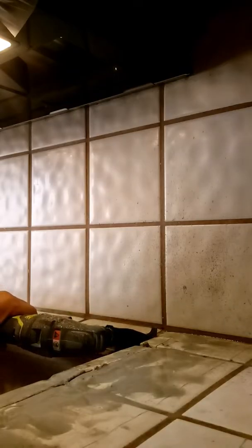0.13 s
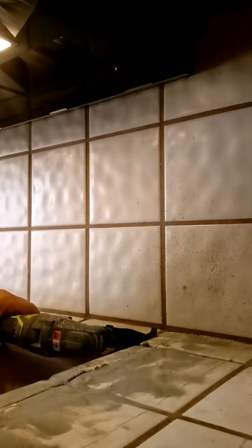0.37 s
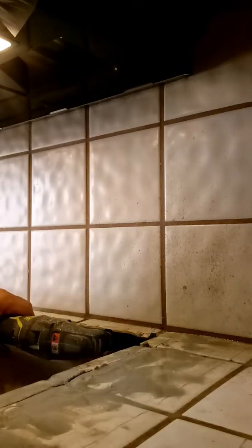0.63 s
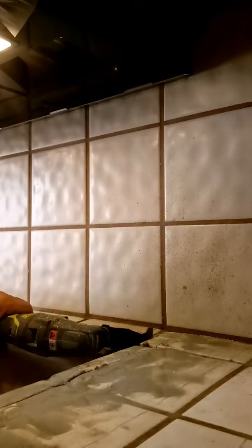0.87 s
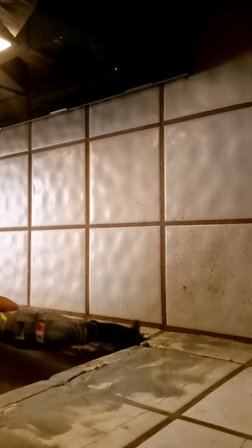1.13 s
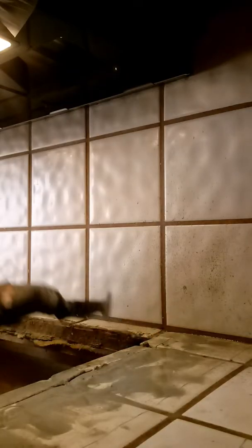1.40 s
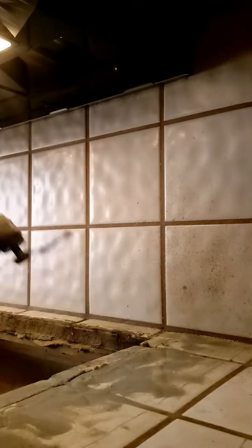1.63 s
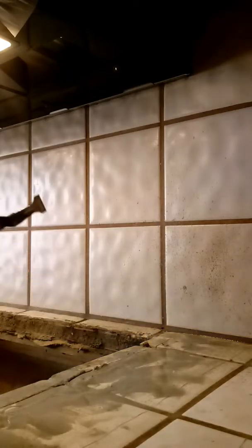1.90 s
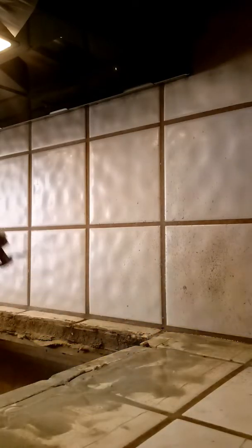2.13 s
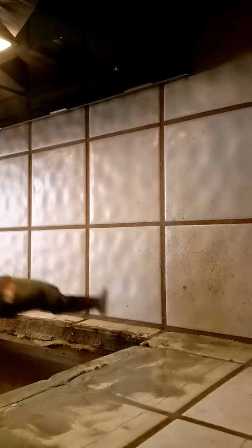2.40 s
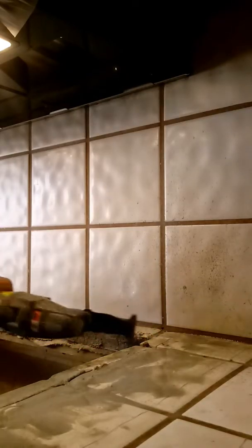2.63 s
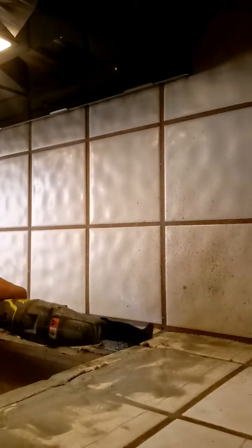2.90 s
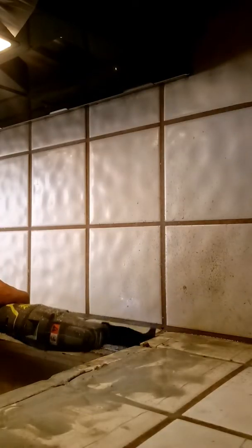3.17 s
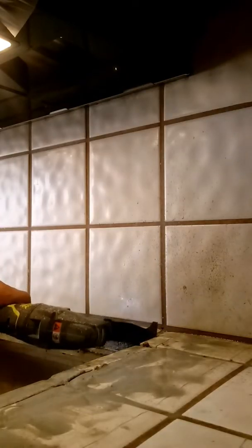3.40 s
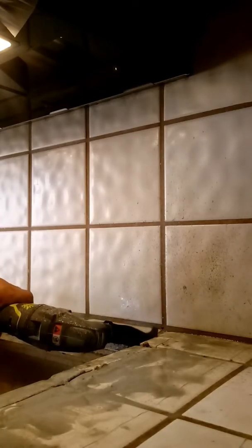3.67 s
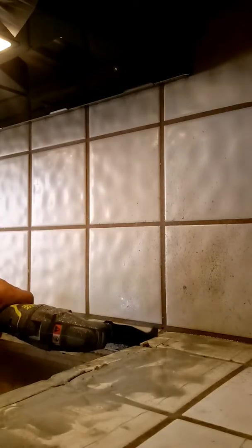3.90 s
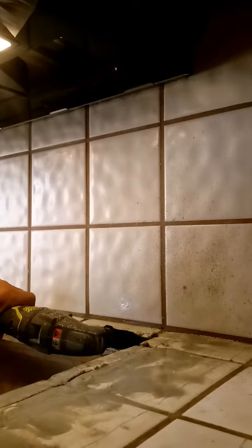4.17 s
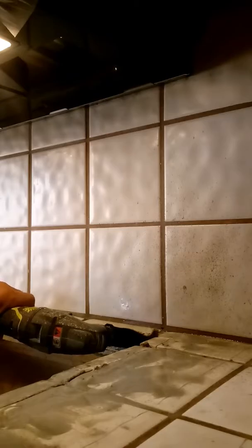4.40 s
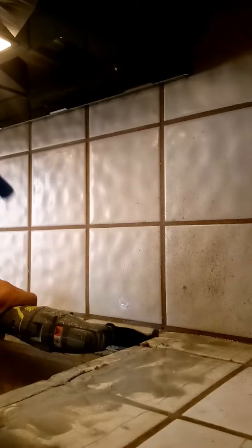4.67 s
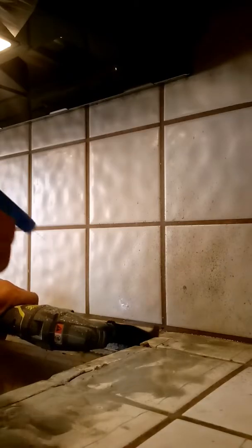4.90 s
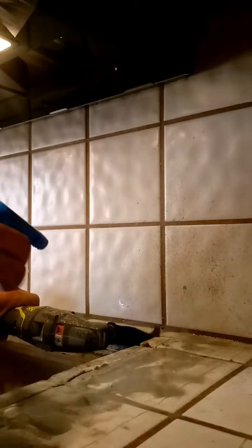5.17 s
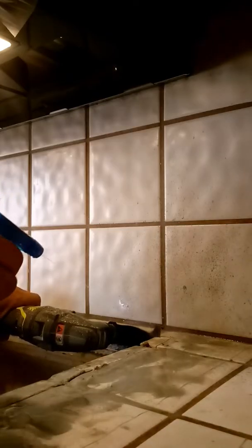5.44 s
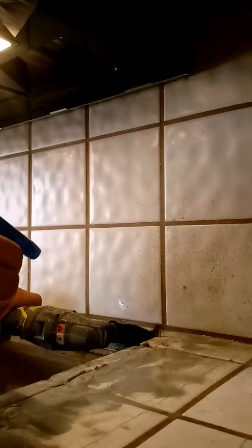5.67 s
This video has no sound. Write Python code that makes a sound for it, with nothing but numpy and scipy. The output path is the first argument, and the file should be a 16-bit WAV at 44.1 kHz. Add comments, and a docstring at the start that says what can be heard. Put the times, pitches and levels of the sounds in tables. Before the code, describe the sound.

A handheld oscillating tool clunks on tile, buzzes twice in the air, then bites in with squeaks and grinds steadily at full speed.

```python
"""A cordless oscillating tool is handled on tiles in a small hard room: struck resonances and filtered grit grains.
It slides with a hollow rustle; then its trigger is squeezed twice in the air, and noise gated by the stroke rattles.
After more knocks the slow blade chatters into the tile and bites with short squeaks in three partials.
Last it runs up to speed and grinds: gated noise rings in the blade under a buzzing whine of stroke multiples."""
import sys
import numpy as np
from scipy import signal
from scipy.fft import rfft, irfft, next_fast_len
from scipy.io import wavfile
from scipy.ndimage import map_coordinates

SR = 44100
rng = np.random.default_rng(int(sys.argv[2]) if len(sys.argv) > 2 else 0)


def master_out(mix):
    """Clip the mix to full scale and print it as 16-bit PCM to the path in sys.argv[1]."""
    frames = np.transpose(np.atleast_2d(mix))
    ceiling = np.clip(frames, -1, 1)
    pcm = np.round(ceiling * 32767).astype(np.int16)
    wavfile.write(sys.argv[1], SR, pcm)


def to_linear_factor(level_db):
    """Convert decibel levels (scalar or array-like) to linear amplitude factors."""
    exponent = np.asarray(level_db, float) / 20
    return 10 ** exponent


N = 255780
T = np.arange(N) / SR

# Colour of the room hiss. Each row: frequency in Hz, relative density in dB per Hz.
HISS_COLOUR = [(20, -18.5), (60, -3.5), (125, -2.5), (250, -10.5), (500, 0.5), (1000, -4.5), (2500, -8.5),
               (5000, -14.5), (7500, -16.5), (10000, -14.5), (13000, -9), (15800, -11)]
HISS_DB = -67
# Low rumble swells. Each row: peak time in seconds, half length (to 1/e) in seconds, level in dB.
RUMBLE_SWELLS = [(0.68, 0.147, -80), (1.33, 0.178, -70), (2.608, 0.078, -68.5), (3.123, 0.125, -64),
                 (3.462, 0.055, -48.5)]
RUMBLE_DB, RUMBLE_RUNNING_DB = -81, -73  # its floor, and what is added with the blade at work
# Reverberation of the room. Each row: frequency in Hz, time to fall 60 dB in seconds.
REVERBERATION = [(300, 1), (800, 0.837), (2100, 0.635), (5500, 0.486), (12000, 0.32)]
# Treble of the microphone. Each row: frequency in Hz, gain in dB.
MICROPHONE_GAIN = [(10500, -0.5), (12300, -5), (13200, -1.5), (14000, -19.5), (14800, -10), (15700, -3)]
TOP_HZ = 15790

# The tool slides away: start, fast fade, then a faint remainder.
SLIDE_S, SLIDE_DB, SLIDE_FADES_DB_PER_S = 1.083, -48.5, 121.5
SLIDE_STAYS_DB, SLIDE_LINGERS_S = -65, 0.91
# Tool dragged on grit; the row at 1.088 s is only a brief rasp within the knock at 1.09 s. Each row: start in
# seconds, end in seconds, level in dB, dull part in dB relative to it.
DRAGS = [(0.0, 0.008, -72, 9), (0.154, 0.16, -71, -11), (0.5, 0.598, -49, -7.5), (0.603, 0.71, -45.5, -7.5),
         (0.825, 0.898, -60.5, -13), (0.968, 1.017, -46, -16.5), (1.012, 1.048, -43.5, 0.5),
         (1.088, 1.089, -38, -2), (1.829, 1.886, -56, 5)]
DRAG_RISE_SHARE, DRAG_FALL_DB_PER_S = 0.262, 418.5  # share of a drag spent rising; dying away after it
# Resonances of tool and blade. Each row: frequency in Hz, basic width in Hz, basic level in dB.
BLADE_MODES = [(814, 34.7, -11), (1514, 82.3, 2.5), (2680, 94, -12), (3017, 58.4, -7), (3707, 237, -11.5),
               (4410, 135, -4.5), (4900, 64.6, -6.5), (5313, 50.5, 2), (6027, 86.7, 5), (7170, 51, -3.5),
               (8200, 31.5, -4.5), (9737, 74, 1.5), (11390, 260, -45), (12940, 133, -7.5),
               (13950, 200, -31.5)]
# Handling knocks and chatter. Each row: start in seconds, level in dB, favoured low resonance in Hz,
# favoured high resonance in Hz, body in dB relative to the rest.
KNOCK_EVENTS = [(0.313, -13, 4384, 5400, -18), (0.52, -31, 4100, 8200, -16.5),
                (0.549, -28, 2310, 4760, -21), (0.579, -33, 1580, 4850, -2),
                (0.609, -25.5, 4080, 4740, -17.5), (0.644, -26.5, 3870, 4900, -24.5),
                (0.662, -28.5, 2680, 4815, -21.5), (0.684, -30, 4010, 4900, -20),
                (0.706, -29, 3970, 5030, -30), (0.826, -33.5, 1355, 2395, -9),
                (0.855, -39, 1250, 4970, -18.5), (0.978, -36.5, 4540, 6040, -20),
                (0.985, -31.5, 4040, 5950, -15.5), (1.023, -26.5, 865, 9650, -16),
                (1.039, -24.5, 841, 4780, -4.5), (1.09, -21, 1087, 5930, -10),
                (1.846, -27.5, 3025, 6240, -41.5), (1.878, -25.5, 820, 8480, -18.5),
                (1.982, -21.5, 3920, 5600, -16), (2.001, -31.5, 3320, 5500, -15.5),
                (2.143, -16.5, 2856, 5600, -13), (2.195, -24.5, 2785, 5340, -20.5),
                (2.212, -19, 4500, 5560, -12.5), (2.274, -26.5, 910, 6870, -20),
                (2.289, -25.5, 850, 5650, -32.5), (2.873, -8, 3785, 9535, -28.5),
                (2.883, -5.5, 3963, 5972, -30), (2.892, -8, 2867, 5830, -11),
                (3.065, -15, 895.8, 5890, 1.5), (3.088, -20.5, 863.7, 5120, -6.5),
                (3.121, -23.5, 888, 4900, -10), (3.241, -22.5, 3795, 5030, -6),
                (3.33, -11, 3060, 4835, -27.5), (3.346, -12, 3534, 4925, -16.5),
                (3.381, -13, 3764, 4830, -25), (3.401, -10.5, 4067, 5120, -5),
                (3.427, -6.5, 1831, 4920, -15), (3.467, -10.5, 3954, 4900, -6.5),
                (3.556, -12.5, 1410, 5060, -9)]
TREBLE_DB, TREBLE_PER_BODY = -21.5, -0.328  # the more body a knock has, the less treble

# Switching whine as the trigger closes. Each row: start in seconds, end in seconds, level in dB.
WHINE_EVENTS = [(1.934, 1.998, -48), (2.345, 2.41, -49.5), (3.193, 3.342, -51)]
# Partials of that whine. Each row: frequency in Hz, relative level in dB.
WHINE_PARTIALS = [(1938, -4), (3871, 1), (3914, 1.5), (5809, -8), (7745, -12.5), (11620, -26.5)]
# Speed of the blade. Each row: time in seconds, strokes per second in Hz.
STROKE_RATE = [(1.95, 60.38), (2.1, 87.58), (2.25, 69.22), (2.38, 89.6), (2.44, 127.6), (2.55, 145.7),
               (2.63, 136.6), (2.82, 71.8), (3.3, 40.54), (3.75, 78.1), (3.85, 80.54), (3.92, 91.62),
               (4.05, 137.8), (4.108, 222.6), (4.15, 251), (4.232, 260.1), (4.356, 262), (4.578, 255.6),
               (4.74, 261.4), (4.97, 256.4), (5.378, 257.7), (5.8, 251.9)]
# The swinging head hums while the motor is slow. Each row: start in seconds, end in seconds,
# mean levels in dB rms of stroke multiples 1, 2 and 3.
HEAD_HUM = [(2.443, 2.742, -56.5, -70.5, -70.5), (3.519, 3.794, -55.5, -49, -50),
            (3.822, 4.088, -47, -53, -52.5)]
HUM_FADE_S = 0.086
# Pure multiples of the stroke. Each row: multiple, basic level in dB rms, drift in dB per second,
# share of the common swell, flicker in dB.
PURE_MULTIPLES = [(1, -49.5, 1, 0.468, 0), (2, -40.5, 2.5, 0.265, 4), (4, -35, -7, 1.33, 2),
                  (5, -30.5, 6.5, 1.1, 2.5), (7, -37.5, -0.5, -0.052, 0), (9, -36.5, 3.5, -1.195, 0.87)]
DRIFT_FROM_S = 4.976  # the drift is zero here
# Common swell of the pure multiples. Each row: time in seconds, swell in dB.
COMMON_SWELL = [(4.1, -3.5), (4.17, 0.5), (4.3, 1), (4.45, -3.5), (4.6, 8), (4.66, -1), (4.7, -4.5),
                (4.84, -4), (4.97, 4), (5.1, -7), (5.38, -6), (5.53, 3.5), (5.6, -5), (5.66, 2.5), (5.8, 3)]
# The loudest multiple, the third. Each row: time in seconds, mean level in dB rms.
THIRD_MULTIPLE = [(4.1, -35.5), (4.17, -29.5), (4.31, -43.5), (4.45, -32), (4.58, -22), (4.65, -22.5),
                  (4.7, -39.5), (4.82, -29.5), (4.97, -21), (5.1, -25), (5.65, -22), (5.8, -24)]
STEADY_S, STEADY_RISE_S = 4.08, 0.0585  # the multiples of the stroke stand out from here on

# Teeth catching in the groove. Each row: start in seconds, level in dB, squeak pitch in Hz.
TOOTH_CATCHES = [(3.7487, -8, 5314), (3.7868, -3.5, 4960), (3.7998, -9, 5035), (3.86, -9, 4873),
                 (3.886, -5.5, 4790), (3.909, -12.5, 4640), (3.9194, -10, 5330), (3.937, -7, 5010),
                 (3.9588, -12.5, 4530), (4.0025, -21.5, 4440)]
TICK_HZ, TICK_DB, TICK_SHARP_DB = 7780, 2.5, 21  # level before pulsing; depth of the pulsing
# Two squeezes in the air, then the cut: one list for each run.
# Each row: time in seconds, level of rattle and grind in dB.
RUN_LEVELS = [
    [(1.94, -53), (1.975, -40.5), (2.0, -28.5), (2.082, -23), (2.184, -27.5), (2.25, -64)],
    [(2.34, -56), (2.375, -39.5), (2.402, -28.5), (2.438, -21.5), (2.636, -22), (2.772, -26.5), (2.87, -34)],
    [(3.31, -48), (3.33, -30.5), (3.364, -35), (3.54, -29), (3.64, -22.5), (3.745, -23.5), (3.78, -49.5),
     (3.79, -33.5), (3.81, -35.5), (3.845, -22), (3.88, -33.5), (3.95, -22.5), (4.16, -15), (4.32, -18.5),
     (4.44, -15.5), (4.6, -17), (5.8, -16.5)],
]
# Housing drone. Each entry: level in dB relative to the run's rattle and grind, run by run.
RUN_DRONE = [-12, -8, -5.5]
# Colour of the housing drone. Each row: frequency in Hz, relative density in dB per Hz.
DRONE_COLOUR = [(94, -62.5), (160, -35.5), (226, -15.5), (279, -22.5), (449, -3.5), (562, -6.5), (654, -2),
                (1030, 1.5), (1430, 0), (1800, -4.5), (2340, -6), (3960, -120)]
MUFFLE_S, MUFFLE_TAKES_S, MUFFLE_DB = 3.8975, 0.369, -16  # the drone sinks once the blade is in the groove
# Squeal as the blade settles in the groove. Each row: time in seconds, mean pitch in Hz, basic level in dB.
BLADE_SQUEAL = [(3.62, 5266, -37.5), (3.68, 5360, -36), (3.76, 5163, -21), (3.78, 5227, -49.5),
                (3.83, 5164, -23), (3.9, 4776, -28), (3.97, 4628, -25), (4.03, 4511, -20.5),
                (4.1, 4430, -28.5)]
# Unsteady multiples of the stroke. Each row: multiple, basic amplitude in dB relative to the grind.
BUZZ_MULTIPLES = [(6, -21.5), (8, -25), (10, -16.5), (11, -15.5), (12, -32), (13, -13.5), (14, -14.5),
                  (15, -22), (16, -14), (17, -15), (18, -10.5), (19, -14.5), (20, -11), (21, -14.5),
                  (22, -13.5), (23, -20.5)]
# Colour of the free blade. Each row: frequency in Hz, relative density in dB per Hz.
RATTLE_COLOUR = [(710, -31), (1200, -8), (1430, -4.5), (1850, -14), (2940, 1), (3500, -2.5), (4490, 0.5),
                 (5510, 0), (6340, -8.5), (7070, -7), (9360, -11), (13400, -44), (15900, -58)]
# Colour of the blade in the tile. Each row: frequency in Hz, relative density in dB per Hz.
GRIND_COLOUR = [(530, -34.5), (900, -23.5), (1030, 4), (1190, -18.5), (1260, 0), (1420, -15), (1830, -4.5),
                (2190, -9.5), (2350, -7.5), (4500, -1.5), (6540, -6.5), (7190, -4.5), (9600, -7.5),
                (11000, -23.5), (15900, -23.5)]


def unit(x):
    """Normalisation: scale to rms 1."""
    return x / np.sqrt(np.mean(x ** 2) + 1e-20)


def along(points, hz):
    """Interpolation of (Hz, value) points on a logarithmic frequency axis."""
    f, v = np.transpose(points)
    return np.interp(np.log(hz + 1), np.log(f + 1), v)


def curves(rows, outside=None):
    """Linear interpolation in time: one value per sample for each column after the first."""
    s, *cols = np.transpose(rows)
    return [np.interp(T, s, c, outside, outside) for c in cols]


def ramp(s, takes):
    """Linear rise: 0 before s, 1 from s + takes on."""
    return np.clip((T - s) / takes, 0, 1)


def wobble(rate):
    """Band-limited fluctuation: a smooth random curve with rate knots a second."""
    coarse = T[::32]
    knots = rng.standard_normal(int(N * rate / SR) + 4)
    return np.interp(T, coarse, map_coordinates(knots, [coarse * rate]))


def filtered(x, response):
    """Linear filtering: the spectrum of x times a complex response of frequency."""
    m = next_fast_len(len(x) + 8192)
    return irfft(rfft(x, m) * response(np.fft.rfftfreq(m, 1 / SR)), m)[:len(x)]


def ringing(hz, modes):
    """Modal superposition: causal response of (Hz, width, dB) resonances with alternating signs."""
    total = 0
    for k, (centre, width, db) in enumerate(modes):
        damping = 1j * hz * width
        total = total + (-1) ** k * to_linear_factor(db) * damping / (centre * centre - hz * hz + damping)
    return total


def echoes(x):
    """Reverberation: convolution with noise whose every frequency decays at its own speed."""
    hz, t, z = signal.stft(rng.standard_normal(SR // 2), SR, nperseg=256)
    decay = to_linear_factor(-60 * t / along(REVERBERATION, hz)[:, None])
    tail = signal.istft(z * decay, SR, nperseg=256)[1]
    delayed = np.pad(x, (250, 0))  # samples
    return signal.fftconvolve(delayed, tail / np.linalg.norm(tail))


def add(out, s, x):
    """Superposition: mix x into out from time s."""
    part = out[round(s * SR):]
    part[:len(x)] += x[:len(part)]


def quiet():
    """Broadband and resonant noise: room hiss, low rumble, cooling air puffing at the microphone."""
    hiss = to_linear_factor(HISS_DB) * unit(filtered(rng.standard_normal(N), lambda hz: to_linear_factor(along(HISS_COLOUR, hz))))
    low = unit(filtered(rng.standard_normal(N), lambda hz: ringing(hz, [(135.2, 120, 0)]) ** 2))
    air = to_linear_factor(5.1 * wobble(7)) * rng.standard_normal(N)
    puffs = unit(filtered(air, lambda hz: ringing(hz, [(32, 25.3, 0)]) ** 2))
    swells = sum(to_linear_factor(db) * np.exp(-((T - s) / half) ** 2) for s, half, db in RUMBLE_SWELLS)
    rumble = to_linear_factor(RUMBLE_DB) + to_linear_factor(RUMBLE_RUNNING_DB) * ramp(2.3, 1.401) + swells
    return hiss + rumble * low + to_linear_factor(-65.5) * ramp(4.289, .33) * puffs


def slide():
    """Friction noise through three hollow resonances: it fades fast, then lingers unevenly."""
    rub = to_linear_factor(2.05 * wobble(39.86)) * rng.standard_normal(N)
    modes = [(2223, 285, 0), (2833, 166, 0.0), (4900, 450, -2)]
    hollow = unit(filtered(rub, lambda hz: ringing(hz, modes) ** 2))
    fades = to_linear_factor(SLIDE_DB - SLIDE_FADES_DB_PER_S * np.abs(T - SLIDE_S))
    lingers = to_linear_factor(SLIDE_STAYS_DB + 1.54 * wobble(11.81)) * (1 - ramp(SLIDE_S, SLIDE_LINGERS_S))
    return (T > SLIDE_S) * (fades + lingers) * hollow


def scrape():
    """Random impulse excitation: uneven grit grains drive the tool's resonances and a dull body."""
    grains = (rng.random((2, N)) < .1) * rng.standard_normal((2, N)) * to_linear_factor(3.07 * wobble(90))
    modes = [(c, 1.67 * w, db) for c, w, db in BLADE_MODES]
    colour = [(900, -36.5), (2000, 0.5), (6000, -9.0), (11000, -10.5), (16000, -39)]
    body = [(597.6, 299, -2.5), (851.6, 104, 3.5), (1250, 363, -1.0)]
    bright = unit(filtered(grains[0], lambda hz: (ringing(hz, modes) + to_linear_factor(-43)) * to_linear_factor(along(colour, hz))))
    dull = unit(filtered(grains[1], lambda hz: ringing(hz, body) ** 2))
    out = np.zeros(N)
    for start, end, db, dull_db in DRAGS:
        rise = ramp(start, DRAG_RISE_SHARE * (end - start)) ** 2
        fall = to_linear_factor(-DRAG_FALL_DB_PER_S * np.maximum(T - end, 0))
        out += to_linear_factor(db) * rise * fall * (bright + to_linear_factor(dull_db) * dull)
    return out


def knocks():
    """Impact excitation: a short rough contact rings the tool near two resonances; the room answers."""
    out, t = np.zeros(N), T[:4000]
    for s, db, low_hz, high_hz, body in KNOCK_EVENTS:
        treble = TREBLE_DB + TREBLE_PER_BODY * body
        rise = 0.000625 * max(to_linear_factor(body + 13.5), 1)  # a duller contact is a softer one
        contact = np.exp(-t / 0.00512) * (1 - np.exp(-t / rise)) * rng.standard_normal(len(t))
        modes = [(c, 2.29 * w, min(g, -2.5) + rng.normal(0, 3.32)) for c, w, g in BLADE_MODES]
        colour = [(100, body - 44), (450, body - 12), (750, body + 3), (1600, body + 2.6), (2400, -6),
                  (5400, -12.5), (6200, treble + 1.33), (10300, treble), (15700, treble - 15)]

        def response(hz):
            low = 1 + ringing(hz, [(low_hz, 0.0085 * low_hz + 80, 14)])
            high = 1 + ringing(hz, [(high_hz, 0.0252 * high_hz + 60, 10)])
            return to_linear_factor(along(colour, hz)) * low * high * (ringing(hz, modes) + to_linear_factor(-14.5))

        hit = filtered(contact, response)
        hit *= to_linear_factor(db - 3.5) / abs(hit).max()
        add(out, s, hit)
        add(out, s, to_linear_factor(-6.5) * echoes(hit))
    return out


def whine():
    """Switching tones: thin, unsteady partials from the motor drive before the shaft gets going."""
    gate, partials = np.zeros(N), np.zeros(N)
    for start, end, db in WHINE_EVENTS:
        gate += to_linear_factor(db) * ramp(start, 0.0081) * np.clip((end - T) / 0.018, 0, 1)
    for hz, db in WHINE_PARTIALS:
        level = np.sqrt(2) * to_linear_factor(db + 3.5 * wobble(90))
        partials += level * np.sin(2 * np.pi * hz * T + 0.77 * wobble(120))
    return gate * partials


def strokes():
    """Phase as the integral of frequency: a running count of blade strokes."""
    return np.cumsum(curves(STROKE_RATE)[0]) / SR


def hum(turn):
    """Periodic motion of the swinging head: three low harmonics of the slow stroke."""
    out = np.zeros(N)
    for k in range(3):
        gate = np.zeros(N)
        for start, end, *dbs in HEAD_HUM:
            rise = ramp(start - HUM_FADE_S / 2, HUM_FADE_S)
            fall = 1 - ramp(end - HUM_FADE_S / 2, HUM_FADE_S)
            gate += to_linear_factor(dbs[k]) * rise * fall
        level = np.sqrt(2) * gate * to_linear_factor(2.286 * wobble(14))
        out += level * np.sin((k + 1) * turn + 0.61 * wobble(37))
    return out


def tones(turn):
    """Harmonic series: low multiples of the stroke, nearly pure, slowly changing in level."""
    out, swell = np.zeros(N), curves(COMMON_SWELL)[0]
    for k, db, drift, share, flicker in PURE_MULTIPLES:
        level = db + drift * (T - DRIFT_FROM_S) + share * swell
        level = level + flicker * wobble(8) + 1.595 * wobble(30)
        tone = np.sin(k * turn + 0.063 * k * wobble(40))
        out += np.sqrt(2) * ramp(STEADY_S, .03) * to_linear_factor(level) * tone
    third_level = curves(THIRD_MULTIPLE, outside=-140)[0] + 2.42 * wobble(30)
    out += np.sqrt(2) * to_linear_factor(third_level) * np.sin(3 * turn + 0.209 * wobble(40))
    return out


def bites():
    """Stick and slip: each catch is a short squeak with partials at 1/2, 1 and 3/2 of its pitch."""
    out, t = np.zeros(N), T[:900]
    for s, db, hz in TOOTH_CATCHES:
        turn = 2 * np.pi * hz * t + np.cumsum(0.077 * rng.standard_normal(len(t)))
        squeak = to_linear_factor(-4) * np.sin(turn / 2) + np.sin(turn) + to_linear_factor(-9) * np.sin(3 * turn / 2)
        envelope = t / 0.001416 * np.exp(1 - t / 0.001318)
        add(out, s, to_linear_factor(db - 6.0) * envelope * squeak)
    return out


def tick(phase, level):
    """Pulsed carrier: a thin tick once a stroke on the first, gentle squeeze."""
    pulse = to_linear_factor(TICK_SHARP_DB * (np.cos(2 * np.pi * phase) - 3) + 3 * wobble(50.4))
    carrier = np.sin(2 * np.pi * TICK_HZ * T + 0.6 * wobble(400))
    return to_linear_factor(level + TICK_DB) * pulse * carrier


def gated(phase, depth_db, scatter_db, spectrum, ring_db):
    """Amplitude modulation: noise swells once a stroke, each at its own strength, and rings in the blade."""
    size = to_linear_factor(scatter_db * rng.standard_normal(int(phase[-1]) + 2))[phase.astype(int)]
    puffs = size * to_linear_factor(depth_db * np.cos(2 * np.pi * phase - np.pi)) * rng.standard_normal(N)
    peaks = [(c, w, 0) for c, w, _ in BLADE_MODES]

    def response(hz):
        return to_linear_factor(along(spectrum, hz)) * (1 + to_linear_factor(ring_db) * abs(ringing(hz, peaks)))

    return unit(filtered(puffs, response))


def housing_drone(phase, levels):
    """Forced vibration: stroke-gated low noise of the housing, which sinks under the grind."""
    level = sum(to_linear_factor(a + b) for a, b in zip(levels, RUN_DRONE))
    muffle = to_linear_factor(MUFFLE_DB * ramp(MUFFLE_S, MUFFLE_TAKES_S) + 1.314 * wobble(15))
    return level * muffle * gated(phase, 4.0, 1.0, DRONE_COLOUR, ring_db=-19.0)


def squeal(phase):
    """Friction-driven oscillation: three unsteady partials pulse once a stroke."""
    hz, level = curves(BLADE_SQUEAL)[0], curves(BLADE_SQUEAL, outside=-140)[1]
    turn = 2 * np.pi * np.cumsum(hz * (1 + .045 * wobble(300))) / SR
    partials = to_linear_factor(-4) * np.sin(turn / 2) + np.sin(turn) + to_linear_factor(-17) * np.sin(3 * turn / 2)
    return to_linear_factor(level + 7.94 * np.cos(2 * np.pi * phase) + 5.97 * wobble(90) - 5) * partials


def buzz(phase, steady):
    """Modulated harmonics: uneven contact makes each stroke multiple swell and smear on its own."""
    out = np.zeros(N)
    for k, db in BUZZ_MULTIPLES:
        level = to_linear_factor(db + 2.14 * wobble(9) + 2.5 * wobble(60))
        out += steady * level * np.sin(2 * np.pi * k * phase + 0.1295 * k * wobble(60))
    return out


def rattle_and_grind(phase, edge):
    """Contact noise: power passes from the free blade's rattle to the cutting blade's grind."""
    bite = ramp(3.387, 1.31)  # share of the blade in the cut
    slow = np.clip((4.1 - T) / 0.136, 0, 1) * (T > 3.2)
    chatter = 2.24 * slow * wobble(70)  # the slow blade skips over the tile
    uneven = to_linear_factor(2.94 * wobble(600) + chatter)  # loose parts tick unevenly
    free = unit(uneven * gated(phase, 1.2, 1.4, RATTLE_COLOUR, ring_db=-25.0))
    pressure = to_linear_factor(0.28 * wobble(25) + 0.54 * wobble(500) + chatter)
    cut = pressure * gated(phase, 1.23, 1.78, GRIND_COLOUR, ring_db=3.0)
    return edge * to_linear_factor(-3.5) * (np.sqrt(1 - bite) * free + np.sqrt(bite) * cut)


def tool(phase):
    """Superposition of the running tool's noises, all locked to one stroke except the squeal's pitch and tick's."""
    levels = [curves(rows, outside=-140)[0] for rows in RUN_LEVELS]
    rise = ramp(STEADY_S, STEADY_RISE_S)
    edge = sum(to_linear_factor(a) for a in levels) * to_linear_factor(0.824 * wobble(14) * rise)  # hand pressure wavers
    out = tick(phase, levels[0]) + housing_drone(phase, levels) + squeal(phase)
    return out + buzz(phase, edge * rise) + rattle_and_grind(phase, edge)


def scene():
    """Direct and reverberant sound reach one microphone."""
    phase = strokes()
    turn = 2 * np.pi * phase
    near = scrape() + whine() + bites() + tool(phase)
    reverberant = to_linear_factor(-7.0) * echoes(near)[:N]
    mono = quiet() + slide() + knocks() + hum(turn) + tones(turn) + near + reverberant
    return np.array([mono, mono])


def top_cut(x):
    """Nothing passes above the cut-off."""
    return signal.sosfilt(signal.butter(12, 16520, fs=SR, output="sos"), x)


def record(dry):
    """Transducer response: a mono microphone with an uneven treble and a band limit."""
    mono = filtered(dry[0], lambda hz: to_linear_factor(along(MICROPHONE_GAIN, hz)) * (hz < TOP_HZ))
    mix = np.array([mono, mono])
    return top_cut(mix)


dry = scene()
out = record(dry)
master_out(out)
```